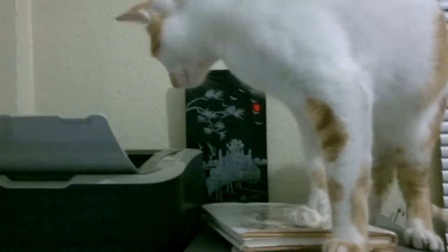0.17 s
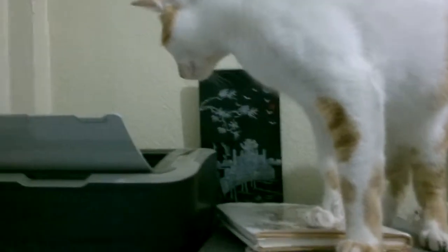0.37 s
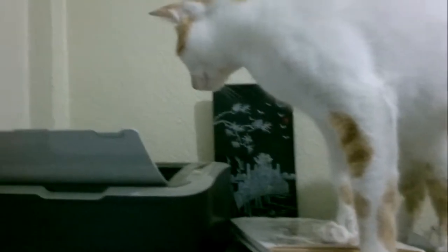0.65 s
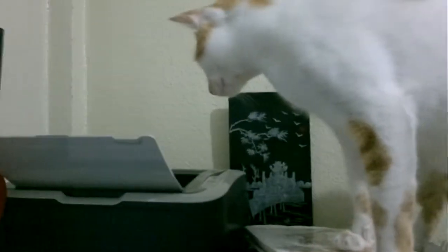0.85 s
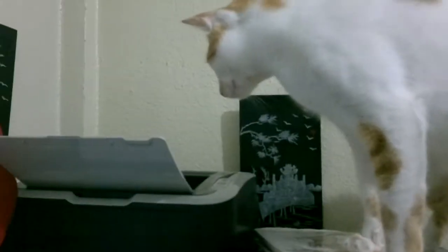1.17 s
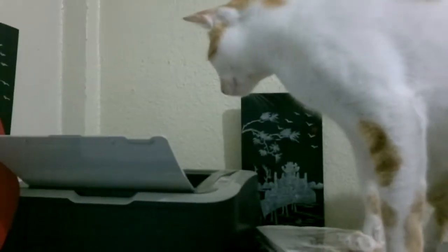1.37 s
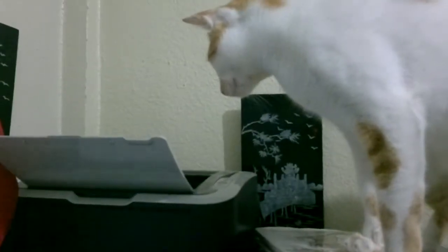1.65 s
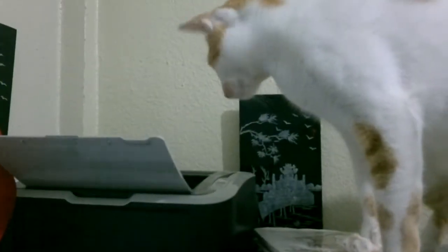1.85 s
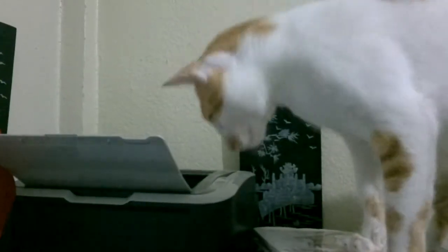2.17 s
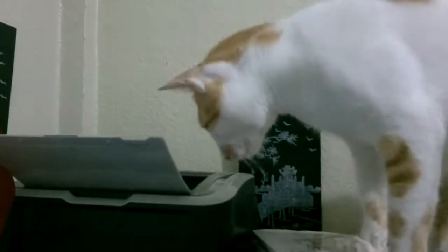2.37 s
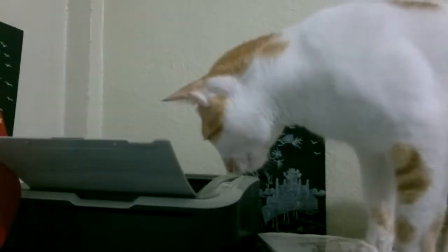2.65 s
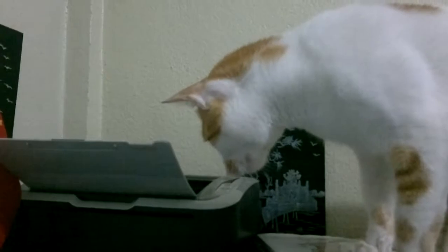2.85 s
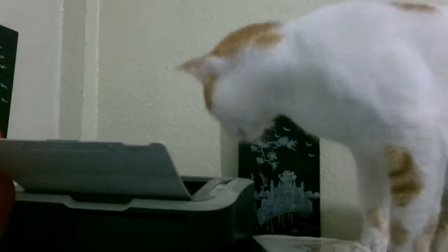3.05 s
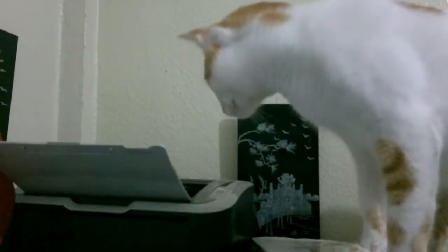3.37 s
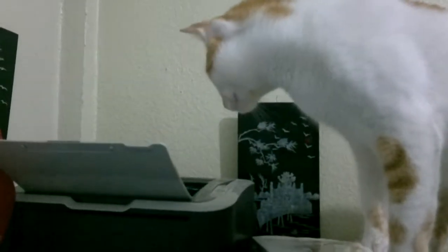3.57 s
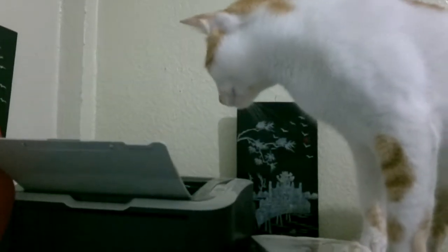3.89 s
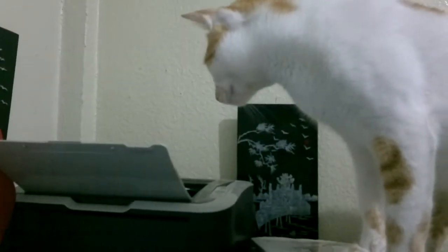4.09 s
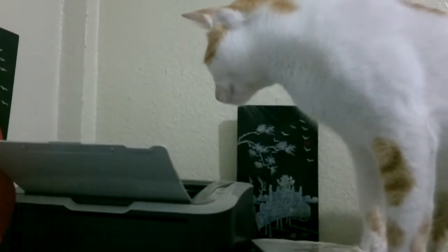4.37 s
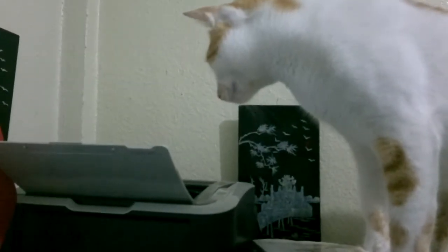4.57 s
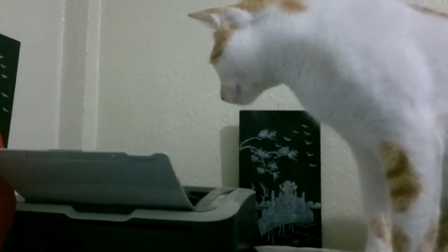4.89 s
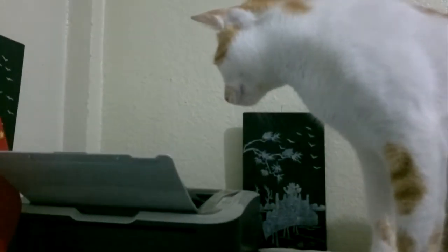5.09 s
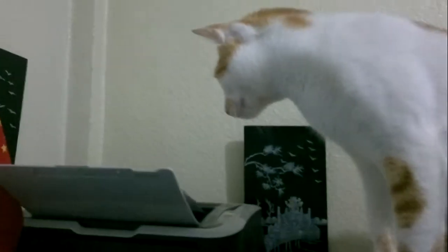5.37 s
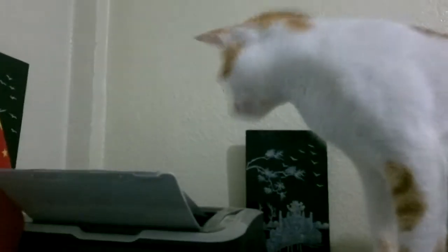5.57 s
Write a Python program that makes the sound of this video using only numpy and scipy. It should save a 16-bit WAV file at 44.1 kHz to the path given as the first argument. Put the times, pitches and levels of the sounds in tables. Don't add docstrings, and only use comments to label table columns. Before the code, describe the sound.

A small desktop printer whirs and hums, clutches clacking, paper rustling and snapping through, with one hard clack about two seconds in.

```python
import sys
import numpy as np
from scipy import signal
from scipy.fft import rfft, irfft, next_fast_len
from scipy.io import wavfile

SR = 44100
rng = np.random.default_rng(int(sys.argv[2]) if len(sys.argv) > 2 else 0)


def volts(x):
    e = np.asarray(x, float) / 20
    return 10 ** e


def wav_out(sig):
    wavfile.write(sys.argv[1], SR, np.round(np.clip(np.atleast_2d(sig).T, -1, 1) * 32767).astype(np.int16))


N = 252693
NOW = np.arange(N) / SR
PAD = next_fast_len(N)

# (pitch [Hz], rms level [dB])
FAN_TONES = [(585.2, -41.5), (360, -54), (197, -60), (732, -58), (10530, -80)]
# (frequency [Hz], level per Hz [dB])
RUSH_COLOUR = [(35, -53), (60, -36), (91, -26), (226, -11), (273, -3.5), (367, -4.5), (415, -4.5),
               (471, -3), (586, -5.5), (643, -4.5), (839, -7), (1570, -20), (2500, -27), (3250, -32),
               (5500, -120)]
# (frequency [Hz], level per Hz [dB])
HISS_COLOUR = [(880, 10), (1500, -1.5), (1580, -18), (1710, -5), (1880, -2.5), (2720, -5), (3030, 2),
               (3590, -0.5), (4080, 0.5), (7540, -21.5), (11800, -24.5), (14800, -26), (16000, -25)]
# (time [s], level [dB])
FEED_EFFORT = [(0, -66), (.2, -62), (.38, -52), (.61, -48), (1.21, -47), (1.47, -43), (1.88, -41),
               (2.08, -43.5), (2.4, -41.7), (4.61, -41.2), (4.82, -44.5), (4.96, -42), (5.1, -45),
               (5.49, -46), (5.73, -43)]
# (frequency [Hz], width [Hz], level [dB])
VENT_MODES = [(2060, 210, 2), (3000, 460, -1), (4720, 600, -0.5), (5340, 230, -6), (8100, 730, -18),
              (11700, 4100, -20)]
# (frequency [Hz], width [Hz], level [dB])
DESK_MODES = [(59.2, 6.8, -3), (88, 3.6, 1), (30, 26, -10)]
# (time [s], level [dB])
TRAFFIC_LEVEL = [
    (0, -69),
    (2.3, -67.5),
    (4.6, -58.5),
    (4.85, -49),
    (4.96, -70),
    (5.04, -49.5),
    (5.49, -47.5),
    (5.73, -53),
]
# (time [s], peak level [dB])
HAND_PUSHES = [
    (0.359, -47),
    (0.599, -51),
    (0.869, -48),
    (1.439, -56),
    (3.529, -47),
    (4.849, -45),
]
# (time [s], peak level [dB], pitch [Hz], time to fall 60 dB [s])
PART_PINGS = [(.008, -28, 700, .1), (.53, -23, 840, .16), (.672, -27, 670, .12), (1.2138, -19.5, 942, .06),
              (1.2268, -17, 1050, .08), (1.2275, -26, 4500, .05), (1.3145, -36, 9500, .02),
              (1.334, -32, 9300, .03), (1.4198, -30, 9000, .03), (1.427, -20, 956, .07),
              (1.2138, -32, 7000, .02), (1.238, -23, 1450, .04), (1.315, -28, 1400, .03),
              (1.588, -32, 6000, .04), (1.6927, -26, 1300, .05), (1.932, -28, 3300, .06),
              (1.9531, -20, 1400, .04), (1.955, -24, 4000, .03), (1.9816, -18, 3900, .04),
              (1.9925, -8, 3700, .02), (1.993, -12, 900, .04), (1.994, -17, 600, .05),
              (1.9925, -15, 2800, .025), (1.998, -24, 6300, .02), (2.008, -30, 6300, .04),
              (3.347, -31, 1700, .04), (3.348, -30, 2500, .03), (3.347, -32, 1200, .04),
              (4.2417, -25, 1750, .025), (4.2417, -30, 3100, .02), (4.2935, -23, 900, .04),
              (4.2945, -22, 1760, .05), (4.337, -21, 3960, .04), (4.345, -26, 1900, .03),
              (4.3694, -20, 961, .05), (4.5255, -21, 3900, .025), (4.5236, -28, 5600, .015),
              (4.564, -27, 1050, .04), (4.589, -28, 900, .04), (4.5984, -28, 5100, .03),
              (4.624, -30, 1700, .03), (4.664, -21, 3760, .06), (4.681, -24, 3800, .05),
              (4.682, -28, 6000, .03), (4.7366, -22, 3800, .04), (5.567, -22, 2850, .06),
              (5.569, -24, 2050, .05), (5.714, -29, 1400, .04)]

# (time [s], peak level [dB], time to fall 60 dB [s])
CHASSIS_THUDS = [(0.385, -32, 0.23), (0.409, -42, 0.13), (0.525, -22.5, 0.22), (0.585, -22, 0.09),
                 (0.668, -23.5, 0.12), (1.214, -17.5, 0.16), (1.689, -26.5, 0.12), (1.953, -30, 0.12),
                 (1.983, -21, 0.12), (4.294, -21, 0.11), (4.333, -28, 0.12), (4.369, -39, 0.11),
                 (5.639, -28, 0.12)]
# (time [s], peak level [dB], tick against peak [dB], time to fall 60 dB [s])
CLUTCH_CATCHES = [(0.387, -31, -1.2, 0.12), (0.561, -31.5, -4, 0.069), (0.589, -44, -12, 0.078),
                  (0.681, -35, -17, 0.11), (1.2135, -21, -7, 0.12), (1.228, -22.5, -.6, 0.13),
                  (1.296, -23.5, -6, 0.2), (1.424, -23, -20, 0.12), (1.588, -34.5, -7, 0.12),
                  (1.844, -34.5, 6, 0.11), (1.93, -22.5, -4, 0.11), (4.369, -21, -3, 0.08),
                  (4.523, -23.5, -1.5, 0.12), (4.598, -24, -2, 0.1), (4.736, -42.5, 11, 0.11)]
# (time [s], peak level [dB], tick against peak [dB], time to fall 60 dB [s],
# shafts against peak [dB])
ROLLER_KNOCKS = [(0.365, -29.5, -13, 0.11, -11), (0.525, -23.5, -.5, 0.2, -4), (1.692, -19.5, -5, 0.11, -9),
                 (1.952, -15.5, -3.5, 0.09, -8), (1.981, -14, -4, 0.082, -3), (1.992, -15, -3, 0.078, -4),
                 (3.346, -20.5, -8, 0.08, -2.5), (4.24, -22, -5, 0.07, -.6), (4.292, -21.5, 0, 0.17, 1),
                 (4.333, -25, 3, 0.16, -1), (4.663, -30.5, 3, 0.18, 2.2), (4.682, -33, 6, 0.081, 1),
                 (5.538, -38, -0.6, 0.11, 4.5), (5.565, -32.5, 12, 0.11, 11), (5.589, -28, 1.2, 0.11, -7),
                 (5.639, -27.5, -0.6, 0.15, -6), (5.714, -27, -6.5, 0.11, -1.5)]
# (time [s], peak level [dB])
RIB_FLICKS = [(.365, -47), (1.214, -36), (1.228, -35), (1.296, -35), (1.3145, -34), (1.334, -31),
              (1.36, -35), (1.42, -30), (1.588, -33), (1.952, -40), (1.981, -26), (1.992, -25), (4.24, -39),
              (4.332, -30), (4.369, -32), (4.523, -28), (4.598, -36), (4.663, -31), (4.687, -27),
              (5.589, -31), (5.714, -47)]
# (time [s], peak level [dB], time to fall 60 dB [s])
PLATE_SNAPS = [
    (0.388, -41, 0.12),
    (1.8447, -28, 0.12),
    (1.8674, -32, 0.1),
    (4.334, -25, 0.08),
    (4.5264, -24, 0.11),
    (4.6606, -23.5, 0.11),
    (4.672, -31, 0.089),
    (4.737, -25, 0.082),
    (4.7594, -38, 0.14),
]
# (time [s], peak level [dB], time to fall 60 dB [s])
HARD_STOPS = [
    (1.227, -13, 0.022),
    (1.9915, -6, 0.022),
    (4.369, -21, 0.021),
    (5.568, -21, 0.02),
]

# (frequency [Hz], width [Hz], level [dB])
CHASSIS_MODES = [(290, 100, -1), (384, 37, 7), (478, 97, -4.5), (707, 180, 1)]
# (frequency [Hz], width [Hz], level [dB])
CASING_MODES = [(675, 170, -5.5), (828, 55, 5.5), (938, 86, 4), (1126, 76, -1), (1337, 90, -2)]
# (frequency [Hz], width [Hz], level [dB])
SHAFT_MODES = [(1570, 56, 2), (1760, 80, 4.5), (1905, 270, -3), (2480, 180, -7.5)]
# (frequency [Hz], width [Hz], level [dB])
TICK_MODES = [(2954, 550, -4.5), (3500, 450, -1.5), (3770, 136, 1.5), (4340, 390, -4), (5480, 730, -17)]
# (frequency [Hz], width [Hz], level [dB])
FLICK_MODES = [(6070, 660, 15), (8000, 1300, 0), (9600, 5900, 1), (13000, 2000, -41)]
# (frequency [Hz], width [Hz], level [dB])
PLATE_MODES = [(3730, 85, -1), (3970, 140, 1)]

MOTOR_ORDERS = np.array([1, 2, 3, 4, 6, 12, 18, 30, 33, 36, 39, 48, 51, 60, 63, 66, 69, 72, 75, 78, 81, 84, 87, 90, 96, 99, 108, 111]) / 3
MOTOR_ORDER_DB = [-67.5, -49.5, -43.5, -60.5, -50, -60, -68, -60, -65, -72, -70, -75, -82, -83, -83, -83,
                  -82, -81, -80, -74, -80, -84, -74, -81, -85, -83, -84, -87]
# (time [s], length [s], level [dB], pitch [Hz], width [Hz])
STRAINED_PARTS = [
    (4.52, .14, -36, 930, 160),
    (1.325, .09, -39.5, 4450, 250),
    (1.31, .09, -39, 3150, 300),
    (4.3, .025, -32, 4300, 300),
]
# (firmest time [s], level [dB], time to rise 20 dB [s], time to fall 20 dB [s],
# tilt [dB per octave])
SHEET_TOUCHES = [(1.336, -23.5, .05, .12, 1.8), (1.378, -26.5, .06, .06, -.6),
                 (1.421, -22.5, .003, .022, 2.5), (1.598, -34.5, .045, .3, -1.5),
                 (1.655, -37, .06, .06, -5), (1.694, -26.5, .025, .025, -3), (1.725, -32, .006, .11, -.6),
                 (1.877, -27.5, .05, .055, -1.5), (1.933, -31, .03, .035, 1.2), (3.03, -37, .12, .05, -5),
                 (4.526, -34.5, .006, .15, 2.2), (4.58, -36, .07, .15, -6), (4.667, -23, .015, .06, 2.2),
                 (4.739, -30, .021, .021, 1.2), (5.568, -28, .016, .11, 1.2), (5.6, -26, .05, .035, -1.2),
                 (5.645, -36, .04, .07, -1.5)]
# (frequency [Hz], level per Hz [dB])
PAPER_COLOUR = [(290, -37), (500, -6), (893, -7.5), (933, -1.5), (1090, -10.5), (1640, -6.5), (2160, -10.5),
                (3060, -3.5), (4340, -4.5), (5160, -13), (9490, -20.5), (14900, -32), (16000, -41)]

# (frequency [Hz], left minus right [dB])
DRIVE_BALANCE = [(30, -4), (60, -12.5), (99, 0), (160, -5.5), (270, -4.0), (450, -4.5), (740, -4.0),
                 (1220, -3.5), (2010, -1.5), (3330, -10.5), (5500, 10.5), (9080, 46), (15000, 89)]
# (frequency [Hz], left minus right [dB])
PAPER_BALANCE = [(60, -5.0), (99, 0), (160, -3), (270, -4.5), (450, -1), (740, -4), (1220, -3), (2010, -3),
                 (3330, -6), (5500, -0.5), (9080, 5), (15000, 37)]
# (frequency [Hz], share alike [1])
PORT_LIKENESS = [(60, 0.74), (300, 1), (700, .97), (1400, 0.85), (3000, 0.46), (6000, 0.2), (15000, 0.15)]
# (frequency [Hz], lead [radians])
PORT_LEAD = [(0, 0.5), (700, 0.5), (1150, 0.8), (1640, 1.5), (2840, 4), (3960, 6), (6700, 10), (22050, 30)]

FULL_FEED_DB = -42
RUSH_DB, RUSH_FOLLOWS = -37.4, .05
THIN_TILT, THIN_TILT_MAX = .3, 2.2
SHEET_OUT_S, SHEET_OUT_TILT = 4.78, -1.6
VENT_DB = -55
SHAKE_DB, SHAKE_S = -12, .07
PING_SPLIT = .03
CLUTCH_SHAFT_DB = -19
CHASSIS_CUT_HZ = 3000
FLICK_T60_S = .08
STEP_HZ = 420.33
START_S, START_SPEED, SPEEDUP_PER_S = .55, .31, 1.55
SING_DB, SING_RISE_DB_PER_S = -35.5, -12
SING_ATTACK_S, SING_END_S, SING_RELEASE_S = .03, .83, .02
HUM_DB, HUM_SETTLE_S, HUM_FADE_DB_PER_S = 2.5, .15, .4
STRAIN_EDGE_S = .012
SLIDE_DB = -4.6
ROOM_T60_S, ROOM_DB = 0.22, -6


def rms_one(x):
    return x / np.sqrt(np.mean(x ** 2) + 1e-20)


def in_time(rows):
    s, *columns = np.transpose(rows)
    return [np.interp(NOW, s, column) for column in columns]


def at_hz(points, hz):
    point_hz, value = np.transpose(points)
    return np.interp(np.log(hz), np.log(point_hz), value)


def spectrum_hz():
    return np.maximum(np.arange(PAD // 2 + 1) * SR / PAD, 1)


def drift(rate):
    r = np.exp(-80 * np.pi * rate / SR)
    coarse = rng.standard_normal(N // 40 + 2002)
    slow = signal.lfilter([1], [1, -2 * r, r * r], coarse)[2000:]
    return np.interp(np.arange(N) / 40, np.arange(len(slow)), rms_one(slow))


def tone(phase, level_db, wobble_db):
    level = np.sqrt(2) * volts(level_db + wobble_db * drift(6.2))
    return level * np.sin(phase + 2 * np.pi * rng.random())


def resonate(x, modes):
    out = 0
    for k, (hz, width_hz, level_db) in enumerate(modes):
        r = np.exp(-np.pi * width_hz / SR)
        a = [1, -2 * r * np.cos(2 * np.pi * hz / SR), r * r]
        out = out + (-1) ** k * volts(level_db) * signal.lfilter([1 - r * r, 0, r * r - 1], a, x)
    return out


def rough_noise(grain_db, shape):
    return volts(grain_db * np.minimum(rng.exponential(1, N), 4)) * rng.standard_normal(shape)


def airflow(colour, patchy_db, grain_db, tilt_db=0):
    hz = spectrum_hz()
    shaped = rfft(rough_noise(grain_db, (2, N)), PAD) * volts(at_hz(colour, hz))
    out, together = 0, drift(5.6)
    lowest, highest = int(np.log2(colour[0][0])) + 1, int(np.log2(colour[-1][0])) + 1
    for octave in range(lowest, highest + 1):
        share = np.clip(1 - abs(np.log2(hz) - octave), 0, 1)
        gain_db = patchy_db * (.7 * together + drift(14)) + tilt_db * (octave - 12)
        out = out + volts(gain_db) * irfft(shaped * share, PAD)[:, :N]
    return rms_one(out)


def fan():
    turn = 2 * np.pi * np.cumsum(1 + .0006 * drift(2.014)) / SR
    return sum(tone(hz * turn, level_db, wobble_db=1.1) for hz, level_db in FAN_TONES)


def rush(feed_db):
    level_db = RUSH_DB + RUSH_FOLLOWS * (feed_db - FULL_FEED_DB)
    return volts(level_db) * airflow(RUSH_COLOUR, patchy_db=1.58, grain_db=0.58)


def feed_hiss(feed_db):
    tilt_db = np.minimum(THIN_TILT * (FULL_FEED_DB - feed_db), THIN_TILT_MAX)
    tilt_db += SHEET_OUT_TILT * np.clip((NOW - SHEET_OUT_S) * 20, 0, 1)
    return volts(feed_db) * airflow(HISS_COLOUR, patchy_db=1.27, grain_db=1.5, tilt_db=tilt_db)


def vent():
    return volts(VENT_DB) * rms_one(resonate(rng.standard_normal((2, N)), VENT_MODES))


def rumble():
    shaken = sum(volts(db + SHAKE_DB) * np.exp(-((NOW - s) / SHAKE_S) ** 2) for s, db in HAND_PUSHES)
    traffic_db, = in_time(TRAFFIC_LEVEL)
    return (volts(traffic_db) + shaken) * rms_one(resonate(rng.standard_normal((2, N)), DESK_MODES))


def pings():
    out, age = np.zeros((2, N + SR // 5)), np.arange(SR // 5) / SR
    for s, peak_db, hz, t60 in PART_PINGS:
        main = np.sin(2 * np.pi * hz * age + [[0], [np.pi / 2]])
        neighbour = np.sin(2 * np.pi * (hz * (1 + PING_SPLIT) * age + rng.random((2, 1))))
        dying = volts(peak_db - 4 - 60 * age / max(t60, .005)) * np.minimum(age * hz, 1)
        out[:, round(s * SR):][:, :len(age)] += dying * (main + .6 * neighbour)
    return out[:, :N]


def thumps():
    out, age = np.zeros(N), np.arange(SR // 5) / SR
    swing = np.sin(2 * np.pi * 38 * age) * age / 0.02 * np.exp(1 - age / 0.026)
    for s, peak_db in HAND_PUSHES:
        out[round(s * SR):][:len(age)] += volts(peak_db - 6) * swing
    return out


def struck(blows, modes, sharp):
    favoured = volts(rng.normal(0, 2.07, (len(blows), len(modes), 1)))
    chatter = rough_noise(1.4, (2, N))
    force, age = np.full((len(modes), N + SR // 5), 1e-18), np.arange(SR // 5) / SR
    start = (1 + sharp * np.exp(-age / 0.0013)) * np.minimum(age / 0.00058, 1)
    for (s, level_db, t60), lean in zip(blows, favoured):
        dying = volts(level_db - 60 * age / max(t60, .01)) * start
        force[:, round(s * SR):][:, :len(age)] += lean * dying
    rings = sum((-1) ** k * resonate(force[k, :N] * chatter, [mode]) for k, mode in enumerate(modes))
    return rings / np.std(resonate(chatter[0, :SR // 2], modes))


def thuds():
    out = struck(np.array(CHASSIS_THUDS) - [0, 6, 0], CHASSIS_MODES, sharp=0.29)
    return signal.sosfilt(signal.butter(2, CHASSIS_CUT_HZ, fs=SR, output="sos"), out)


def knocks():
    clutches = [(*row, CLUTCH_SHAFT_DB) for row in CLUTCH_CATCHES]
    s, peak_db, tick_db, t60, shaft_db = np.transpose(clutches + list(ROLLER_KNOCKS))
    out = 0
    for modes, haste, rel_db in [(CASING_MODES, 1.15, -8), (SHAFT_MODES, 1.2, shaft_db - 6),
                                 (TICK_MODES, 1.2, tick_db - 7)]:
        out = out + struck(np.transpose([s, peak_db + rel_db, t60 / haste]), modes, sharp=0.33)
    return out


def flicks():
    return struck([(s, db - 8, FLICK_T60_S) for s, db in RIB_FLICKS], FLICK_MODES, sharp=0.33)


def snaps():
    return struck(np.array(PLATE_SNAPS) - [0, 8, 0], PLATE_MODES, sharp=0.41)


def stepper():
    since_start = NOW - START_S
    speed = np.clip(START_SPEED + SPEEDUP_PER_S * since_start, START_SPEED, 1)
    locked = since_start - (1 - START_SPEED) / SPEEDUP_PER_S
    phase = 2 * np.pi * STEP_HZ * np.cumsum(speed) / SR
    hum = sum(tone(k * phase, db, wobble_db=2.6) for k, db in zip(MOTOR_ORDERS, MOTOR_ORDER_DB))
    settled = 1 / (1 + np.exp(-np.clip(locked / HUM_SETTLE_S * 3, -30, 30)))
    bloom = volts(HUM_DB - HUM_FADE_DB_PER_S * NOW) * settled
    sing_db = SING_DB + SING_RISE_DB_PER_S * since_start + 1.8 * drift(32)
    second = tone(2 * phase + .45 * drift(23), sing_db, wobble_db=1.1)
    sings = np.clip(since_start / SING_ATTACK_S, 0, 1)
    sings *= np.clip(1 - (NOW - SING_END_S) / SING_RELEASE_S, 0, 1)
    return bloom * speed ** 4 * hum + sings * second


def hard_stops():
    modes = [(871, 500, 0.5), (3700, 2500, -9)]   # (frequency [Hz], width [Hz], level [dB])
    return struck(np.array(HARD_STOPS) - [0, 6, 0], modes, sharp=0.36)


def strains():
    out, age = np.zeros((2, N)), np.arange(SR // 4) / SR
    for s, length, level_db, hz, width_hz in STRAINED_PARTS:
        held = np.clip(np.minimum(age, length - age) / STRAIN_EDGE_S, 0, 1)
        sing = rms_one(resonate(rng.standard_normal((2, SR // 4)), [(hz, width_hz, 0)]))
        out[:, round(s * SR):][:, :len(age)] += volts(level_db) * held * sing
    return out


def sheet():
    s, level_db, rise, fall, tilt_db = np.transpose(SHEET_TOUCHES)[:, :, None]
    now = np.arange(0, N, 32) / SR
    away = np.maximum((s - now) / rise, (now - s) / fall)
    touches = volts(level_db + SLIDE_DB - 20 * away) + 1e-9
    total = touches.sum(axis=0)
    mean_tilt = (touches * tilt_db).sum(axis=0) / total
    gain, tilt_db = in_time(np.transpose([now, total, mean_tilt]))
    return gain * airflow(PAPER_COLOUR, patchy_db=.7, grain_db=3, tilt_db=tilt_db)


def room(x):
    age = np.arange(int(.4 * SR)) / SR
    tail = rng.standard_normal((2, len(age))) * volts(-60 * age / ROOM_T60_S) * (age > .006)
    return signal.fftconvolve(x, tail / np.sqrt(np.sum(tail[0] ** 2)), axes=1)[:, :N]


def ports(pair, balance):
    hz = spectrum_hz()
    alike = np.clip(at_hz(PORT_LIKENESS, hz), 0, .99)
    lean = volts(at_hz(balance, hz) / 2)
    lead = np.interp(hz, *np.transpose(PORT_LEAD))
    middle = np.sqrt(lean ** 2 + lean ** -2 + 2 * alike * np.cos(lead)) / 2
    direct, diffuse = rfft(pair, PAD)
    left = lean * direct
    right = (alike * direct * np.exp(-1j * lead) + np.sqrt(1 - alike ** 2) * diffuse) / lean
    return irfft([left / middle, right / middle], PAD)[:, :N]


def scene():
    feed_db, = in_time(FEED_EFFORT)
    steady = rush(feed_db) + feed_hiss(feed_db) + vent() + rumble()
    steady += (fan() + thumps() + stepper()) * [[1], [0]]
    hits = pings() + thuds() + knocks() + flicks() + snaps() + hard_stops() + strains()
    paper_path = sheet() + hits + volts(ROOM_DB) * room(hits)
    return ports(steady, DRIVE_BALANCE) + ports(paper_path, PAPER_BALANCE)


def band_limit(x):
    return signal.sosfilt(signal.butter(12, 15870, fs=SR, output="sos"), x)


def record(dry):
    rounded = np.tanh(dry / 1.1) * 1.1
    mix = signal.sosfilt(signal.cheby2(10, 60, 16300, fs=SR, output="sos"), rounded)
    return band_limit(mix)


dry = scene()
out = record(dry)
wav_out(out)
```